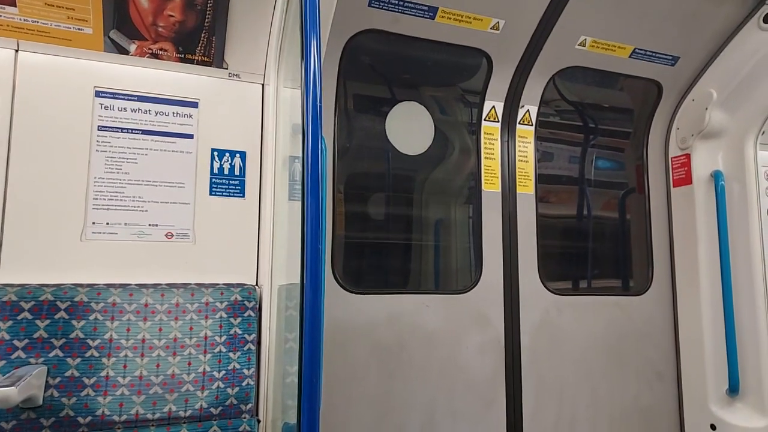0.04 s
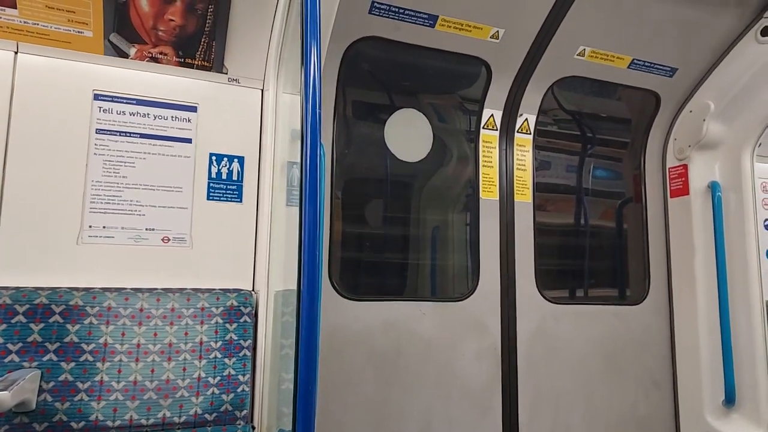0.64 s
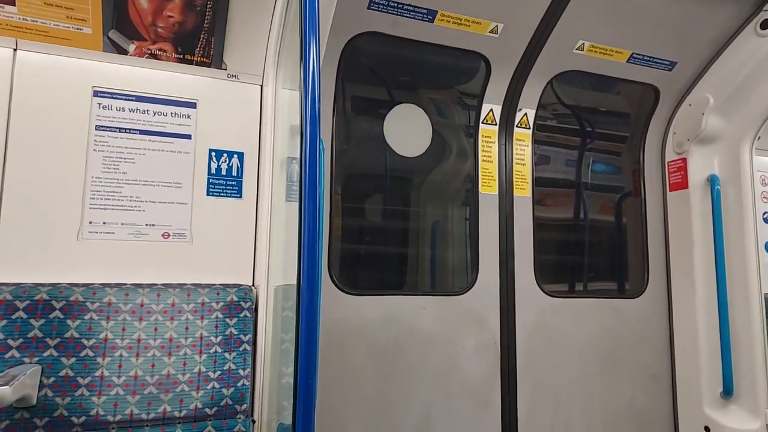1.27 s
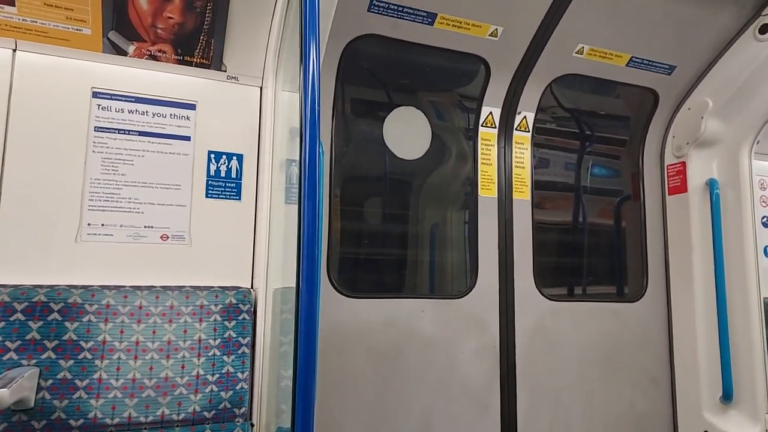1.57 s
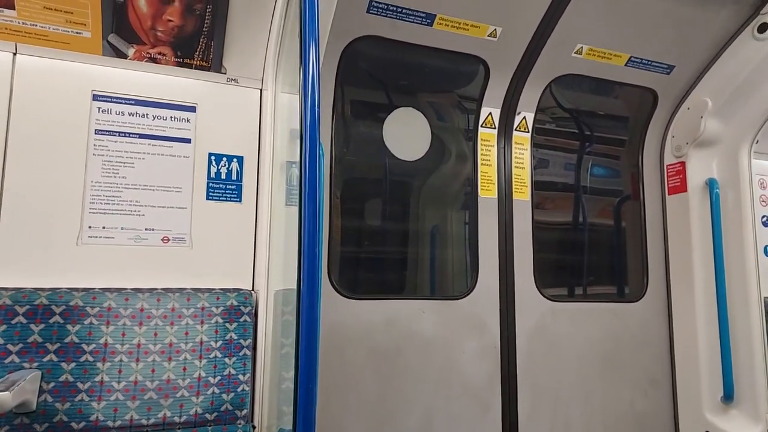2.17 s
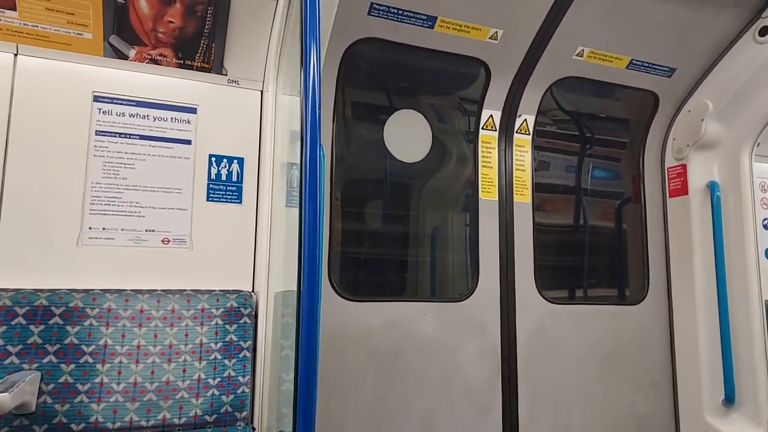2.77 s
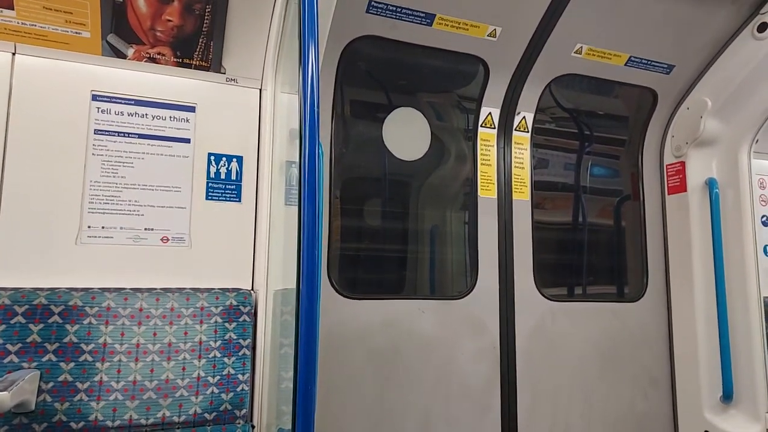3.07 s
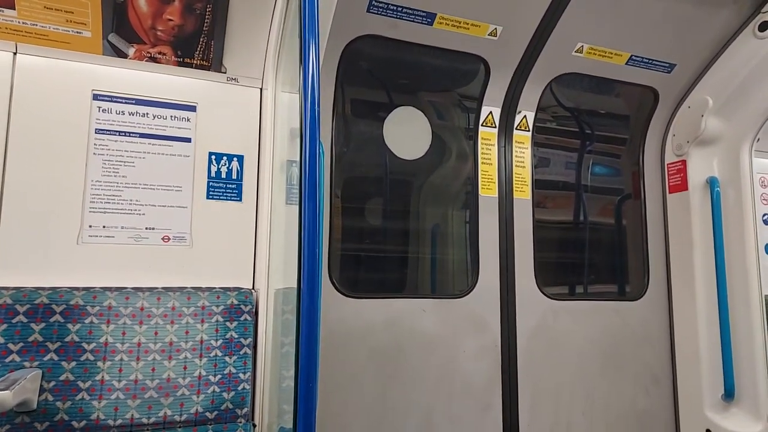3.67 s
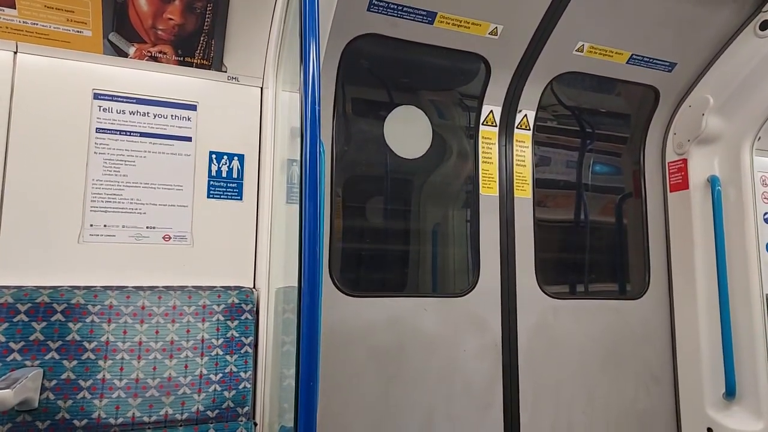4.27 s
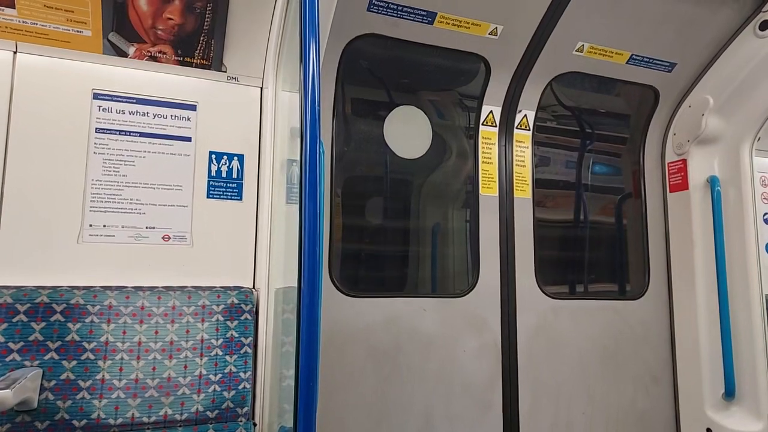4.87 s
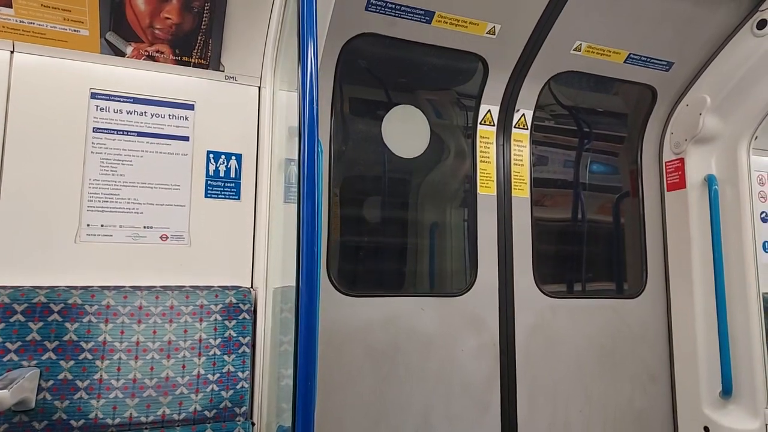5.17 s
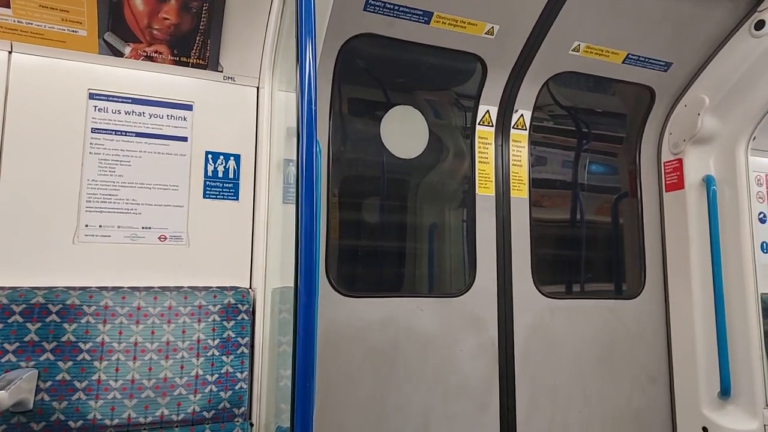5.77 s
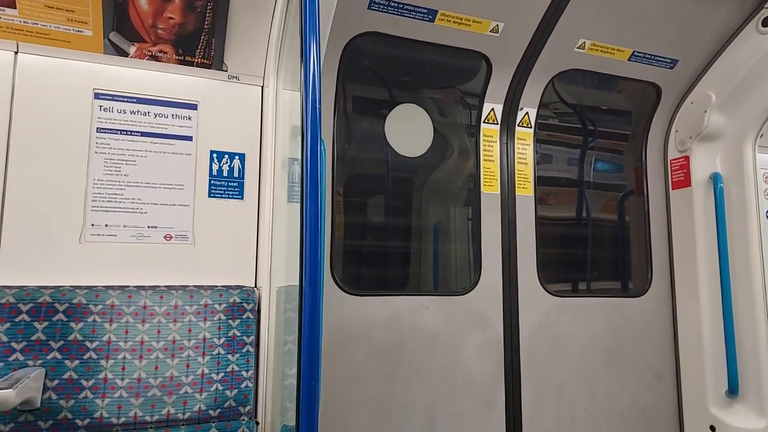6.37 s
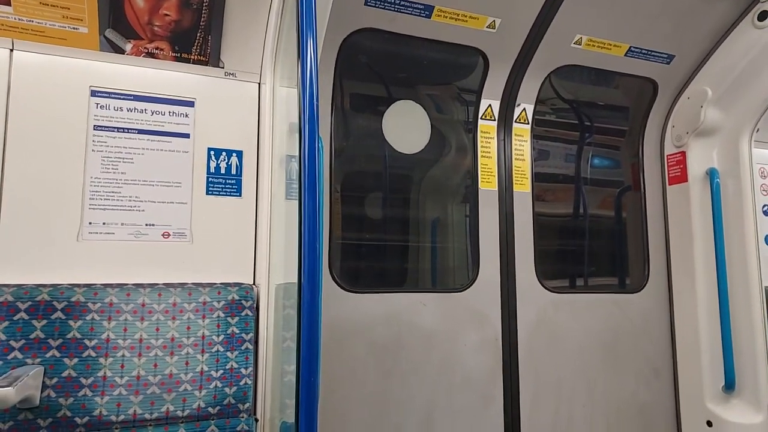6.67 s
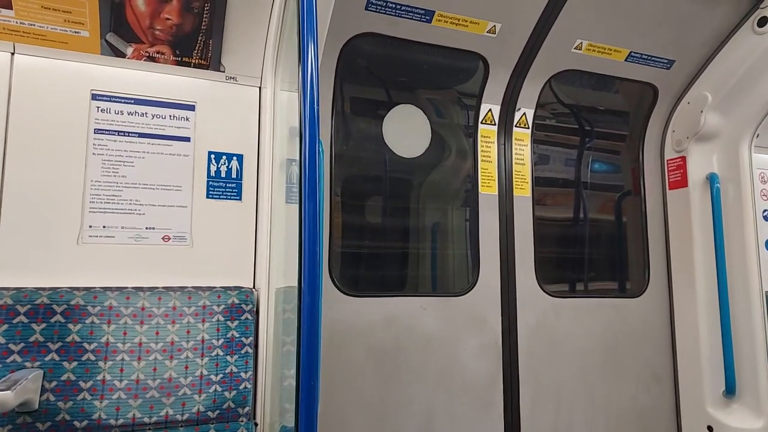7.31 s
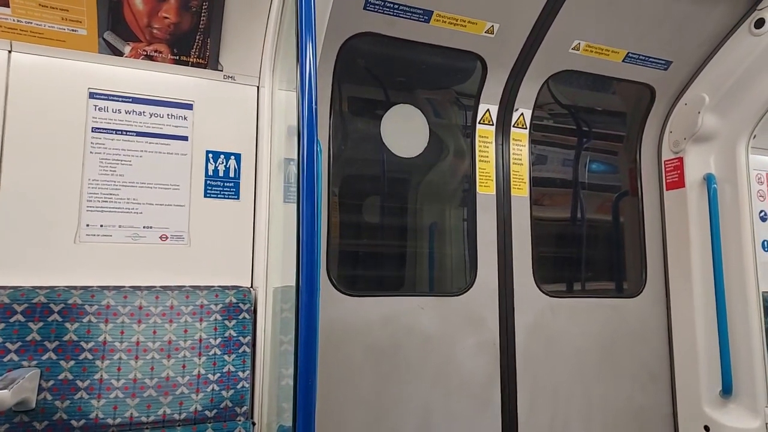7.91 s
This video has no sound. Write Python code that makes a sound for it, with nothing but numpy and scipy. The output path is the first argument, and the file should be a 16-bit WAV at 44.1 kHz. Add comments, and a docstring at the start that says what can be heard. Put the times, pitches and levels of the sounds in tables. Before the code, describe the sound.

Inside a fast underground carriage, loud rumble and wheel hiss surge with thuds and brief squeaks as the rails set up a droning howl.

```python
"""An underground carriage at speed in a tight tunnel, heard on a phone near the doors.
From the start the body rumbles, rough track roars, wheels hiss and collector shoes scrape and catch on
the live rail; all surge as rocking loads the wheels. Jolts thud, wheels and shoes squeak, worn rail
moans and booms. From 1.5 s the wheels cross corrugated rail and howl through the cabin's resonances
while the roar eases. The squeaks end by 3 s. From 5.7 s the roar builds again, then the moans return."""
import sys
import numpy as np
from scipy import signal
from scipy.fft import rfft, irfft
from scipy.io import wavfile
from scipy.ndimage import uniform_filter1d, minimum_filter1d

SR = 44100
rng = np.random.default_rng(int(sys.argv[2]) if len(sys.argv) > 2 else 0)


def bounce(signal):
    """Save signal as a 16-bit WAV file at the path given by the first command-line argument."""
    frames = np.transpose(np.atleast_2d(signal))
    limited = np.clip(frames, -1, 1)
    pcm = np.round(limited * 32767).astype(np.int16)
    wavfile.write(sys.argv[1], SR, pcm)


N = 354728
T = np.arange(N) / SR
HZ = np.maximum(np.arange(N // 2 + 1) * SR / N, 1)


def undb(db):
    """Decibels to gain."""
    return 10 ** (np.asarray(db) / 20)


def curves(table):
    """Each column of a timed table, per sample."""
    times_s, *columns = np.transpose(table)
    return [np.interp(T, times_s, column) for column in columns]


def response(points):
    """Gain per FFT bin from (freq_hz, level_db) points."""
    hz, db = np.transpose(points)
    return undb(np.interp(np.log(HZ), np.log(hz), db))


def hump(hz, width_hz):
    """Gain of a resonance passed twice."""
    return 1 / (1 + ((HZ - hz) / width_hz) ** 2)


def ringing(modes):
    """Gain of resonances over a flat response."""
    return np.sqrt(1 + sum((undb(db) * hump(hz, width_hz / 2)) ** 2 for hz, width_hz, db in modes))


def noise():
    """Two independent white noises."""
    return rng.standard_normal((2, N))


def walk(rate_hz, size=N):
    """Smooth random drift, unit spread."""
    knots = rng.standard_normal(8192)
    drift = np.interp(T[:size] * rate_hz, np.arange(len(knots)), knots)
    drift = uniform_filter1d(drift, int(SR / rate_hz) + 1)
    return drift / drift.std()


def ragged_tone(hz, width_hz, count=2, size=SR // 2):
    """Independent tones of wandering amplitude and phase, unit level."""
    phase = 2 * np.pi * hz * T[:size]
    return np.array([walk(2 * width_hz, size) * np.cos(phase) + walk(2 * width_hz, size) * np.sin(phase)
                     for _ in range(count)])


def steadied(pair, window_s, share):
    """Remove a share of the slow random swell; RMS is kept."""
    power = uniform_filter1d(np.mean(pair ** 2, axis=0), int(window_s * SR) + 1)
    even = pair / (power + 1e-12) ** (share / 2)
    return even * np.sqrt(np.mean(pair ** 2) / np.mean(even ** 2))


def glide(pair, ratio):
    """Resample by a moving pitch ratio."""
    position = np.cumsum(ratio) % (N - 1)
    return np.array([np.interp(position, np.arange(N), x) for x in pair])


def blow(start_s, attack_s, decay_s):
    """Envelope: fast rise, exponential decay."""
    age_s = np.maximum(T - start_s, 0)
    return (1 - np.exp(-age_s / attack_s)) * np.exp(-age_s / decay_s)


def swell(sound, start_s, length_s, peak_share=0.54):
    """Place a short sound under a rounded rise and fall."""
    size = sound.shape[1]
    first = int(np.clip(start_s * SR, 0, N - size))
    envelope = np.sin(np.pi * np.interp(T[:size] / length_s, [0, peak_share, 1], [0, .5, 1]))
    return np.pad(sound * envelope, [(0, 0), (first, N - size - first)])


def panels(ripple_db=1.66, spacing_hz=22, fade_hz=4000):
    """Wall reflections leave fine midrange peaks and dips."""
    knots = rng.standard_normal(4096)
    depth = np.minimum(HZ / 1200, 1) / (1 + (HZ / fade_hz) ** 2)
    return undb(ripple_db * depth * np.interp(HZ / spacing_hz, np.arange(len(knots)), knots))


def port_coherence(max_lag_s=0.00044, left_bias=0.66):
    """Sound reaches the phone's two ports from all round, more from the left, lagged by direction."""
    side = np.cos(np.pi * (np.arange(48) + .5) / 48)[:, None]
    hz = HZ[::64]
    arrivals = (1 + left_bias * side) * np.exp(-2j * np.pi * hz * max_lag_s * side)
    return .99 * np.interp(HZ, hz, arrivals.mean(axis=0) / (1 + (hz / 4500) ** 2))


def heard(pair, gain, coherence, band_hz):
    """Filter two independent signals and blend them into the ports; unit level in the band."""
    # port imbalance: freq_hz, left_minus_right_db
    imbalance = [(60, 0.5), (190, 0), (290, -1), (420, -1), (510, 2.5), (620, 3.5), (1150, 1.2), (1550, 4),
                 (2200, 3), (3500, 1), (4300, -3.5), (5500, -2.5), (7200, 3), (9200, 4), (11500, -2),
                 (15500, -4)]
    tilt = np.sqrt(response(imbalance))
    left, other = rfft(pair) * gain
    right = coherence * left + np.sqrt(np.maximum(1 - abs(coherence) ** 2, 0)) * other
    ports = np.array([left * tilt, right / tilt])
    in_band = ports.mean(axis=0)[(HZ > band_hz[0]) & (HZ < band_hz[1])]
    return irfft(ports, N) * N / np.sqrt(2 * np.sum(abs(in_band) ** 2))


def wheel_load(average_s=0.94):
    """Rocking presses the wheels on the rail; a surge is the load above its local average."""
    # load, as rolling noise: time_s, level_db
    load = [(0, -38), (0.24, -40), (0.31, -35.5), (0.48, -38), (0.89, -34.5), (1.0, -39), (1.06, -38),
            (1.46, -37.5), (1.53, -33), (1.74, -34.5), (1.84, -33), (2.08, -39.5), (2.18, -35),
            (2.33, -32.5), (2.52, -35), (2.8, -33), (2.92, -34.5), (3.7, -36), (3.97, -31.5), (4.2, -35.5),
            (4.4, -32), (4.78, -32.5), (5.0, -35.5), (5.15, -32.5), (5.62, -38), (6.07, -39.5),
            (6.25, -33.5), (6.45, -39), (6.68, -32), (6.87, -36.5), (7.12, -31.5), (7.26, -36), (7.41, -32),
            (7.72, -36.5), (8.04, -35)]
    load_db, = curves(load)
    return load_db, load_db - uniform_filter1d(load_db, int(average_s * SR) + 1)


def track(coherence, surge_db, thud, roar):
    """Uneven rail shakes the body and roars through the floor, more with each surge and jolt."""
    # track roughness: time_s, body_db, low_roar_db, upper_roar_db
    roughness = [(0, -28.5, -26, -27), (0.3, -29.5, -22.5, -28.5), (0.7, -27.5, -25, -27.5),
                 (1.05, -31.5, -18, -24), (1.6, -29.5, -24, -26), (2.1, -34, -26, -35.5),
                 (2.6, -35.5, -31, -33), (3.6, -37, -33.5, -38), (4.6, -35.5, -32, -39.5),
                 (5.5, -36.5, -34, -38.5), (5.76, -32.5, -26.5, -28.5), (6.0, -34, -30, -36),
                 (6.25, -30.5, -26.5, -27.5), (6.7, -30.5, -29, -28.5), (7.4, -33.5, -30, -27),
                 (8.04, -28, -25.5, -28)]
    # rumble and roar spectra: freq_hz, density_db
    body_spectrum = [(15, -51.5), (30, -31), (43, -8), (58, -4), (75, -1), (98, -6.5), (118, -3.5),
                     (134, 3.5), (152, -7), (200, -34.5), (400, -80.5), (2000, -100)]
    low_spectrum = [(20, -84.5), (90, -38), (140, -12.5), (175, -2.5), (215, -2), (255, 4.5), (310, 0),
                    (380, 0.5), (470, -7), (600, -23.5), (900, -47.5), (3000, -90.5)]
    upper_spectrum = [(20, -83), (250, -28), (400, -3.5), (520, 2), (630, 1), (760, 0), (860, -2.5),
                      (970, -7), (1100, -13), (1600, -60.5), (5000, -95.5)]
    # shorter roughness shifts the upper roar higher: time_s, pitch_ratio
    roar_pitch = [(0, 1.02), (.8, 1.038), (1.6, 0.99), (6.2, .99), (6.9, .94), (8.04, 0.97)]
    body_db, low_db, upper_db = curves(roughness)
    body = heard(noise(), response(body_spectrum), coherence, (35, 150))
    low = heard(noise(), response(low_spectrum), coherence, (160, 340))
    upper = heard(noise(), response(upper_spectrum), coherence, (600, 790))
    layers = [(body, body_db + 0.21 * surge_db, thud),
              (low, low_db + 0.74 * surge_db, roar),
              (glide(upper, *curves(roar_pitch)), upper_db + 0.67 * surge_db, undb(-4) * roar)]
    return sum(steadied(band, 0.16, share=1) * np.hypot(undb(db), jolt) for band, db, jolt in layers)


def collector_shoes(coherence, surge_db, sway_db=1.3, grit_db=0.5):
    """Swaying shoes slide grittily on the live rail and catch. Returns sound and scrape envelope."""
    # live rail roughness: time_s, scrape_db, fizz_db
    live_rail = [(0, -68, -72), (.33, -63, -69), (.55, -66.5, -72), (1.0, -66, -70), (1.42, -67, -71),
                 (1.55, -66, -64), (1.72, -63, -67), (2.05, -66.5, -71), (2.6, -66, -71), (3.1, -65.5, -72),
                 (3.6, -65, -66), (3.95, -64.5, -69), (4.2, -65, -69), (4.6, -65.5, -71),
                 (5.3, -68.5, -72.5), (5.6, -70, -70.5), (5.75, -66, -68.5), (6.05, -68.5, -68),
                 (6.4, -67, -64.5), (6.75, -65, -70), (7.0, -66, -69), (7.3, -66.5, -71),
                 (7.65, -69.5, -74), (8.04, -66, -69.5)]
    # shoe catches: start_s, scrape_db, fizz_db, decay_s
    catches = [(.11, -62, -61, .03), (.221, -46.5, -49.5, 0.0069), (.236, -55, -58, .026),
               (.337, -58, -58, .04), (.582, -58, -61, .04), (.645, -59, -62, .05), (.885, -61, -65, .04),
               (1.05, -63, -57, .08), (1.165, -60, -62, 0.037), (1.455, -67, -60, .06),
               (1.80, -61, -66, .05), (1.905, -60, -59, .032), (2.15, -57, -57, .058),
               (2.285, -55, -62, .048), (2.475, -66, -64, .04), (2.76, -59, -68, .032),
               (2.94, -66, -63, .08), (3.22, -66, -68, .06), (3.87, -66, -72, .06), (4.038, -54, -59, .015),
               (4.25, -61, -71.5, .07), (4.43, -63, -72, .04), (4.7, -63, -76, .05),
               (5.13, -66, -70, 0.061), (5.68, -68, -67, .04), (6.23, -61, -65, .05),
               (6.62, -66, -71, 0.049), (6.95, -67, -68, .05), (7.275, -66, -60, .049),
               (7.36, -62.5, -61, .05), (7.77, -66, -68, .06)]
    # sliding spectra: freq_hz, density_db
    scrape_spectrum = [(3000, -11), (6000, -1.5), (7600, -5), (9300, 1), (10800, 0), (12000, -3),
                       (13500, -13), (16000, -22.5)]
    fizz_spectrum = [(6000, -30), (10000, -14.5), (11500, -4), (12500, -1), (13600, 1), (14600, 0.5),
                     (16000, -1.5)]
    scrape = heard(noise(), response(scrape_spectrum) * panels(), coherence, (8500, 12000))
    fizz = heard(noise(), response(fizz_spectrum), coherence, (12000, 15500))
    catching = sum(undb(levels_db)[:, None] * blow(start_s, .12 * decay_s, decay_s)
                   for start_s, *levels_db, decay_s in catches)
    sliding = undb(np.array(curves(live_rail)) + 0.35 * surge_db + sway_db * walk(14))
    scrape_gain, fizz_gain = np.hypot(sliding, catching)
    return undb(grit_db * walk(90)) * (scrape_gain * scrape + fizz_gain * fizz), scrape_gain


def rolling(coherence, load_db, rattle, clatter, scrape_gain, hiss_db=-49.5, flutter_db=0.67):
    """Steel rolls on steel and rings the wheels; wheels, door rattle and shoes share one hiss."""
    # contact spectra: freq_hz, density_db
    roll_spectrum = [(100, -55.5), (600, -22), (950, 2), (1150, 4.5), (1330, 5), (1420, 2.5), (1580, 4.5),
                     (1850, 0), (2100, -0.5), (2450, -5), (2800, -13.5), (3500, -20), (6000, -58.5),
                     (9000, -78.5)]
    hiss_spectrum = [(1500, -16), (2700, 4.5), (3300, 3), (4000, 1), (5000, -2), (6200, -5.5), (7000, -13),
                     (7600, -25), (9000, -46)]
    # wheel modes: pitch_hz, width_hz, gain_db
    wheel_modes = [(1380, 36, -5.5), (1500, 99, -1.5), (1737, 220, 1.5), (2400, 200, -5)]
    roll_filter = response(roll_spectrum) * ringing(wheel_modes) * panels()
    roll = heard(noise(), roll_filter, coherence, (1150, 2600))
    hiss = heard(noise(), response(hiss_spectrum) * panels(), coherence, (3300, 7000))
    wheel_hiss = undb(hiss_db + 0.81 * (load_db - load_db.mean()))
    shoe_hiss = undb(9) * scrape_gain
    hiss_gain = np.sqrt(wheel_hiss ** 2 + rattle ** 2 + shoe_hiss ** 2)
    return undb(flutter_db * walk(24)) * (roll * np.hypot(undb(load_db), clatter) + hiss * hiss_gain)


def jolts(attack_s=0.012, decay_s=0.094):
    """Jolts shake the carriage. Returns thud, roar, rattle and clatter envelopes."""
    # jolts: start_s, body_thud_db, floor_roar_db, door_rattle_db, wheel_clatter_db
    hits = [(.09, -25, -42, -48, -50), (1.035, -32, -36, -44, -28.5), (1.125, -38, -19.5, -52, -35),
            (1.39, -27, -33, -59, -50), (1.8, -30, -33, -43, -28), (2.17, -27, -36, -51, -35),
            (2.275, -38.5, -38, -42, -29), (2.62, -32, -40, -55, -43), (3.44, -28.5, -43, -55, -47),
            (4.025, -20, -26, -40, -38), (5.64, -33, -26.5, -52, -46), (5.82, -28, -34, -54, -37),
            (6.9, -22, -26, -58, -37), (7.33, -21, -27, -57, -33)]
    return sum(undb(levels_db)[:, None] * blow(start_s, attack_s, decay_s)
               for start_s, *levels_db in hits)


def squeaks(waver_hz=9, skirt_db=-5):
    """Short raspy squeaks: mid-pitched from the wheels, thin and very high from the collector shoes."""
    # squeaks: start_s, length_s, pitch_hz, rasp_width_hz, rasp_db, tone_re_rasp_db
    events = [(0.105, 0.15, 2940, 150, -39, -12), (0.28, 0.1, 1570, 100, -34, -18),
              (0.555, 0.24, 2940, 188, -38.5, -7), (1.06, 0.23, 10800, 330, -63, -20),
              (1.125, .11, 14400, 800, -55, -25), (1.29, .09, 1606, 80, -35, -8),
              (1.48, .12, 15400, 350, -62, -18), (1.57, .11, 10000, 330, -64, -20),
              (1.904, 0.083, 13900, 1400, -55, -30), (2.72, 0.14, 1915, 200, -36, -24)]
    sound = 0
    for start_s, length_s, hz, width_hz, rasp_db, tone_db in events:
        pitch_hz = hz + waver_hz * walk(46, SR // 2)
        tone = np.sqrt(2) * np.sin(2 * np.pi * np.cumsum(pitch_hz) / SR)
        rasp = ragged_tone(hz, width_hz) + undb(skirt_db) * ragged_tone(hz, 2.8 * width_hz)
        sound += undb(rasp_db) * swell(rasp + undb(tone_db) * tone, start_s, length_s, peak_share=0.3)
    return sound


def worn_rail(coherence):
    """Worn patches moan hollowly as the wheels cross them."""
    # patches: start_s, length_s, pitch_hz, width_hz, level_db
    patches = [(.17, 0.38, 774, 110.1, -22), (0.476, .24, 725, 61, -30), (0.729, 0.2, 783, 76.2, -23.5),
               (1.08, 0.18, 689, 64, -23), (6.221, 0.2, 650, 58, -26), (6.702, 0.14, 634, 45, -21),
               (6.982, 0.21, 595, 50, -23.5), (7.83, 0.096, 626, 40, -33)]
    moans = 0
    for start_s, length_s, hz, width_hz, db in patches:
        moan = steadied(ragged_tone(hz, width_hz), 0.052, share=0.59)
        moans += undb(db) * swell(moan, start_s, length_s)
    return heard(moans, 1, coherence, (500, 950)) * moans.std()


def track_dips(width_hz=45):
    """Dips in the track make the floor boom, alike in both ports."""
    # dips: start_s, length_s, pitch_hz, level_db
    dips = [(0.35, 0.13, 288, -15), (.82, 0.11, 182, -17.5), (0.831, 0.14, 454, -23.5),
            (1.116, 0.096, 280, -27), (1.32, 0.1, 190, -21), (1.496, 0.094, 294, -22),
            (1.6, 0.15, 191.7, -22.5), (5.74, 0.086, 258, -21)]
    booms = 0
    for start_s, length_s, hz, db in dips:
        boom = steadied(ragged_tone(hz, width_hz, count=1), 0.43, share=0.73)
        booms += undb(db) * swell(boom, start_s, length_s)
    return booms


def corrugation(coherence, surge_db, overtone_scatter_hz=31, entry_db_per_s=45):
    """Wheels drum over uneven rail ripples; the cabin rings on the note and overtones sing above."""
    # ripple depth: time_s, howl_db, octave_db
    depth = [(1.55, -26, -35.5), (1.72, -23, -26.5), (1.89, -13, -25.5), (2.08, -22.5, -26.5),
             (2.28, -16, -23.5), (2.48, -20, -24), (2.88, -16, -26), (3.17, -15, -25.5), (3.47, -14, -27),
             (3.72, -17, -26.5), (3.86, -17, -27), (4.3, -15, -26), (4.87, -17, -28.5), (5.45, -20, -31),
             (5.62, -21.5, -37.5), (5.98, -26, -38), (6.09, -19, -33.5), (6.42, -26, -48),
             (6.62, -17, -31.5), (7.36, -19.5, -28), (7.78, -27, -36.5), (8.04, -26.5, -35)]
    # ripple crossing rate: time_s, rate_hz, scatter_hz
    ripples = [(1.5, 445.3, 27.8), (2.15, 449.7, 27.12), (2.4, 474.3, 25.7), (3.1, 464.8, 26.3),
               (3.6, 452.4, 25.1), (4.4, 456.8, 24.11), (5.2, 450.8, 27.2), (6.1, 450.2, 28),
               (6.8, 466.2, 49.15), (8.0, 465.8, 55.6)]
    # deeper or shallower patches: centre_s, howl_change_db, octave_change_db, bend_hz
    flares = [(2.3, 2, 4.5, 8), (2.7, 2, -2.5, -10), (2.87, 5.5, -2.5, 22), (3.15, -4.5, -1, 0),
              (3.3, -2, -4, -15), (3.54, 2, 5, 25), (3.7, 0.5, -0.5, -10), (3.87, 8, 2, -5),
              (4.03, 5, -2.5, 0), (4.3, 4, 0.5, 5), (4.77, 3.5, 0.5, 15), (5.128, 2.5, 2, -10.5),
              (5.6, -5, -1, -0.5), (7.35, 3.5, -5, 10.5)]
    # cabin air modes: pitch_hz, width_hz, gain_db
    cabin_modes = [(370, 50, 7), (415.8, 16.5, 13.5), (456, 32, 6.5), (493, 21, -1), (519, 26, 5.5)]
    # a wheel sings on the third harmonic: start_s, length_s, level_db
    singing = [(1.64, 0.26, -36), (2.12, 0.23, -38), (3.36, 0.29, -41), (3.78, 0.23, -44), (4.25, 0.4, -44),
               (5.06, 0.17, -39.5)]
    *flares_db, bend_hz = sum(np.array(change)[:, None] * np.exp(-((T - centre_s) / 0.03108) ** 2)
                              for centre_s, *change in flares)
    howl_db, octave_db = np.add(curves(depth), flares_db)
    ripple_hz, scatter_hz = curves(ripples)

    def wheels(harmonic, spread_hz):
        """One harmonic of two groups of two wheels."""
        cycles = [np.cumsum(ripple_hz + bend_hz + spread_hz * walk(170)) / SR for _ in range(4)]
        return np.sin(2 * np.pi * harmonic * np.array(cycles)).reshape(2, 2, N).sum(axis=1)

    broken = undb(22) * noise()  # broken ripples spread the note and its octave into bands
    cabin_filter = ringing(cabin_modes) * hump(486, 87)
    note = heard(wheels(1, scatter_hz) + broken, cabin_filter, coherence, (390, 550))
    octave = heard(wheels(2, overtone_scatter_hz) + broken / 2, hump(916, 105), coherence, (830, 1030))
    third = heard(wheels(3, overtone_scatter_hz), hump(1342, 35), coherence, (1200, 1450))
    fourth = heard(wheels(4, spread_hz=21), panels(), coherence, (1600, 2100))
    howl = steadied(note, 0.083, share=0.53) * undb(howl_db + 0.2 * surge_db)
    overtones = steadied(octave, 0.058, share=0.82) + undb(-15) * fourth
    overtones *= undb(octave_db + 0.42 * surge_db)
    singing_gain = sum(undb(db) * np.sin(np.pi * np.clip((T - start_s) / length_s, 0, 1))
                       for start_s, length_s, db in singing)
    entry_db = -entry_db_per_s * np.maximum(depth[0][0] - T, 0)  # the ripples grow in
    return undb(entry_db) * (howl + overtones + steadied(third, 0.14, share=0.8) * singing_gain)


def scene():
    """All sources under the floor, driven by wheel load and jolts, at the two ports."""
    coherence = port_coherence()
    load_db, surge_db = wheel_load()
    thud, roar, rattle, clatter = jolts()
    rumble = track(coherence, surge_db, thud, roar)
    wear = worn_rail(coherence) + track_dips()
    howl = corrugation(coherence, surge_db)
    shoes, scrape_gain = collector_shoes(coherence, surge_db)
    roll = rolling(coherence, load_db, rattle, clatter, scrape_gain)
    return rumble + shoes + roll + squeaks() + wear + howl


def record(dry, low_hz=30, top_hz=15720, ceiling=.96, fade_s=.003):
    """The phone cuts deep bass and top treble and eases its gain down around peaks."""
    fades = np.sin(np.pi / 2 * np.minimum(np.minimum(T, T[::-1]) / fade_s, 1)) ** 2
    sound = signal.sosfilt(signal.butter(3, low_hz, "high", fs=SR, output="sos"), dry * fades)
    sound = signal.sosfilt(signal.ellip(14, .1, 90, top_hz, fs=SR, output="sos"), sound)
    limiter_gain = ceiling / np.maximum(abs(sound).max(axis=0), ceiling)
    return sound * uniform_filter1d(minimum_filter1d(limiter_gain, SR // 100), SR // 100)


dry = scene()
out = record(dry)
bounce(out)
```